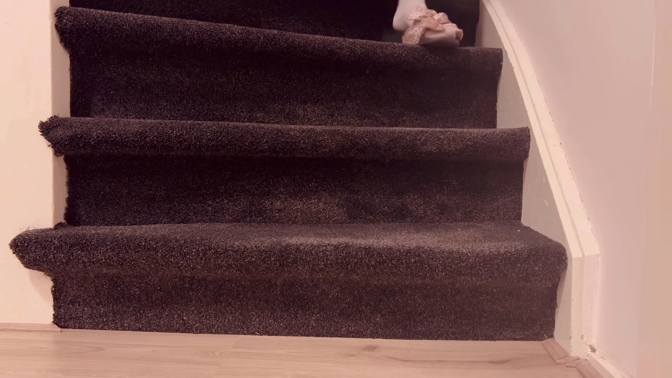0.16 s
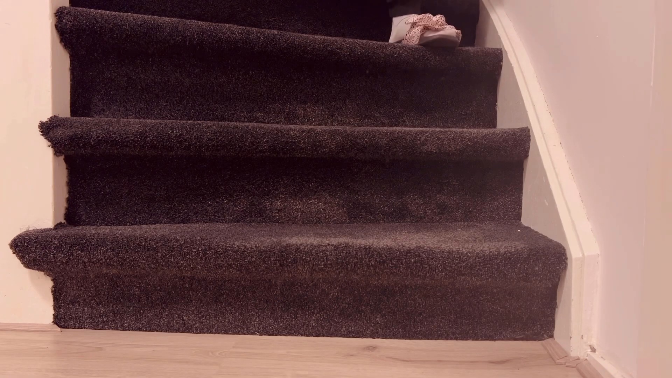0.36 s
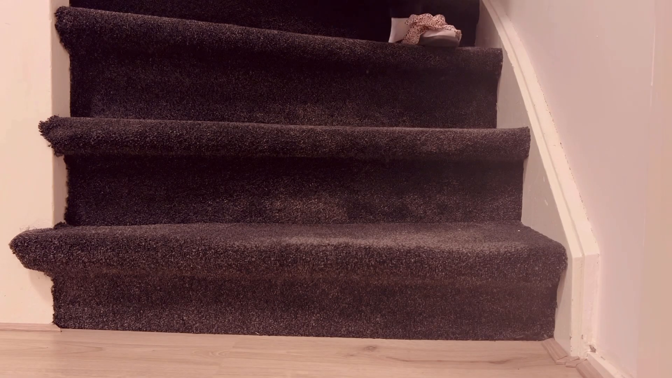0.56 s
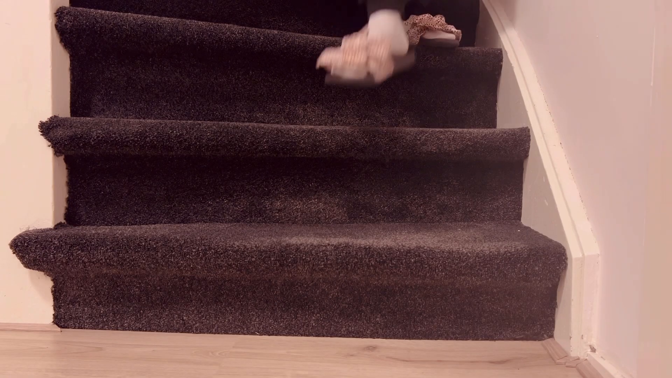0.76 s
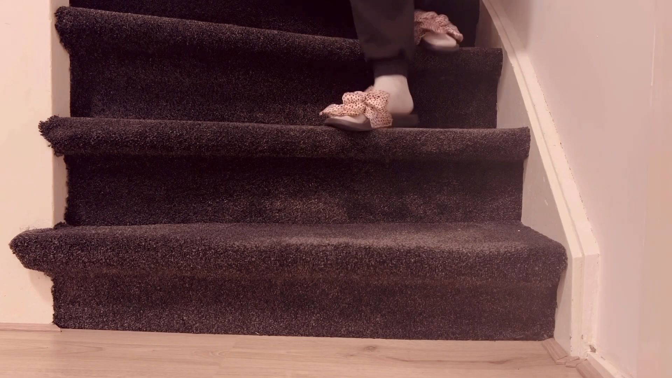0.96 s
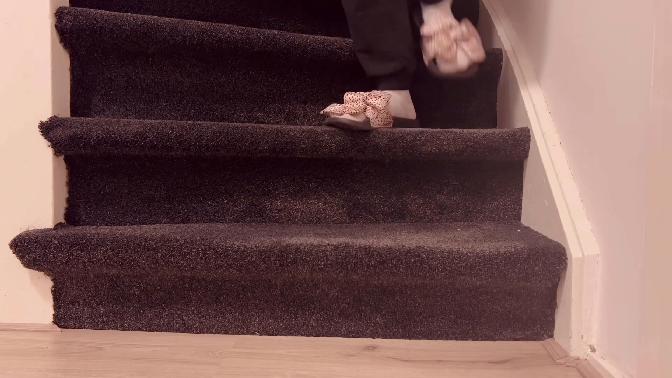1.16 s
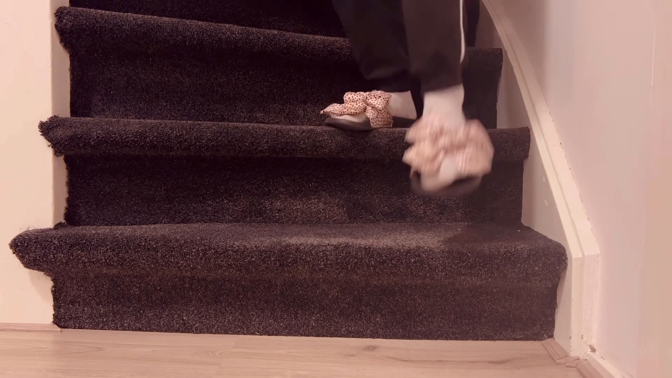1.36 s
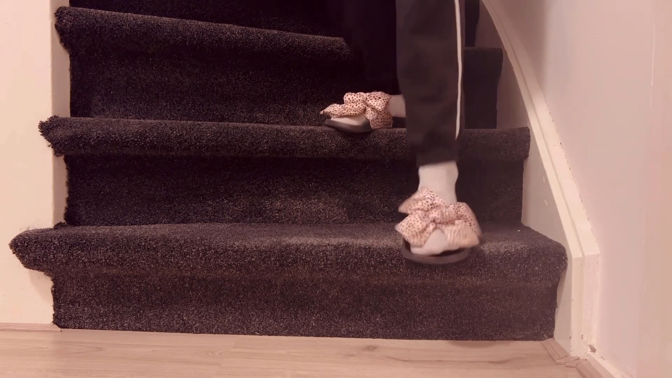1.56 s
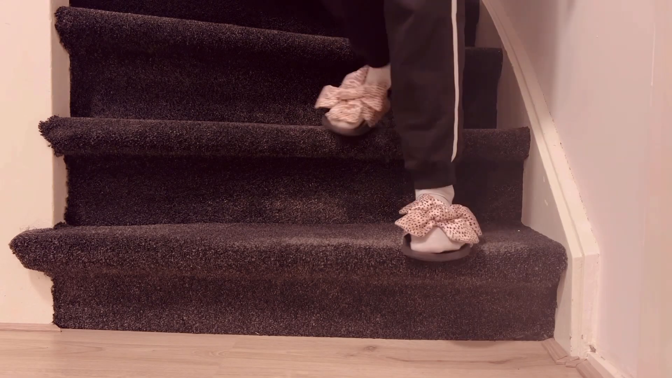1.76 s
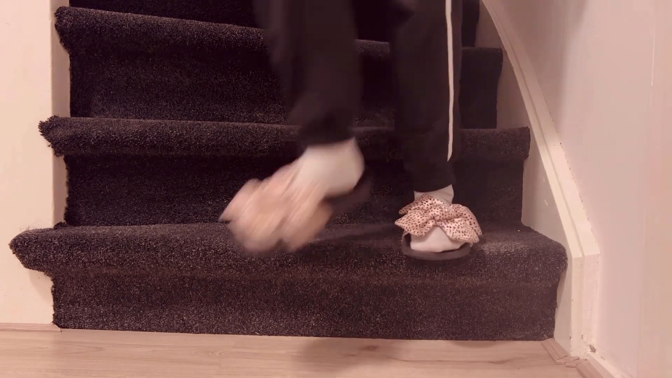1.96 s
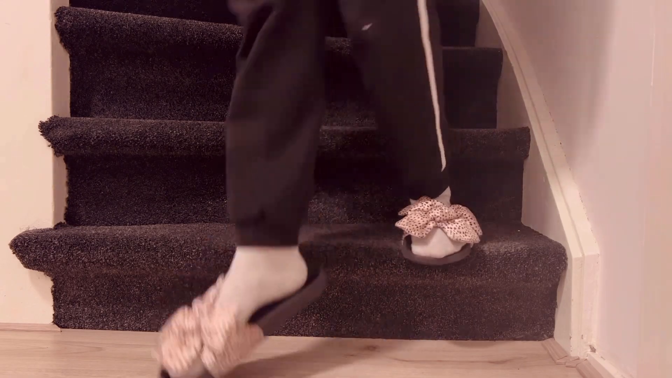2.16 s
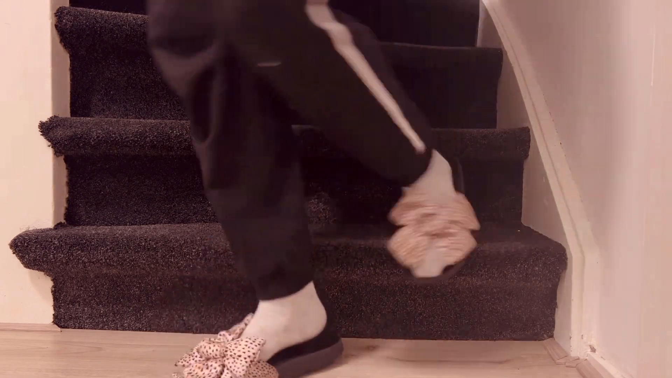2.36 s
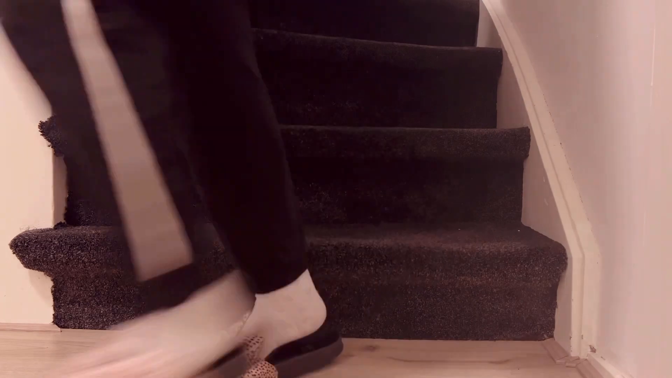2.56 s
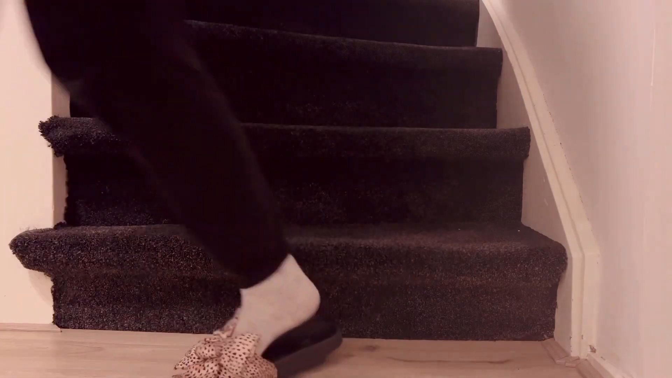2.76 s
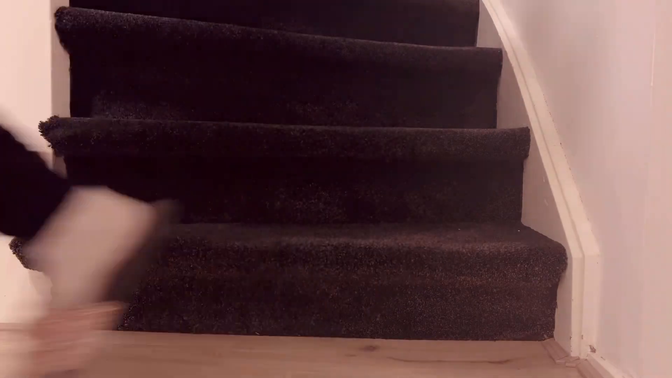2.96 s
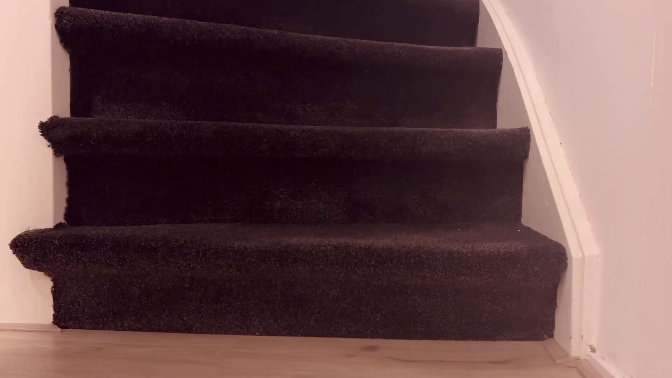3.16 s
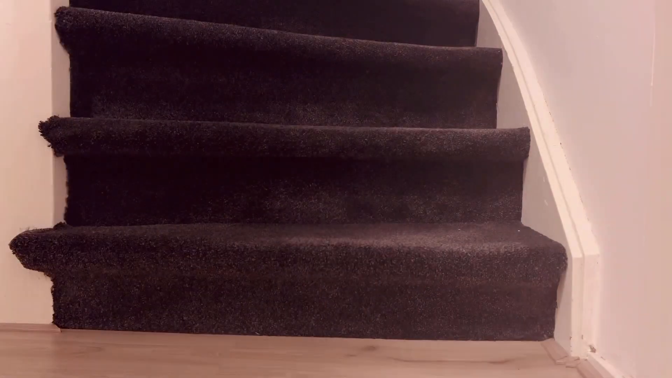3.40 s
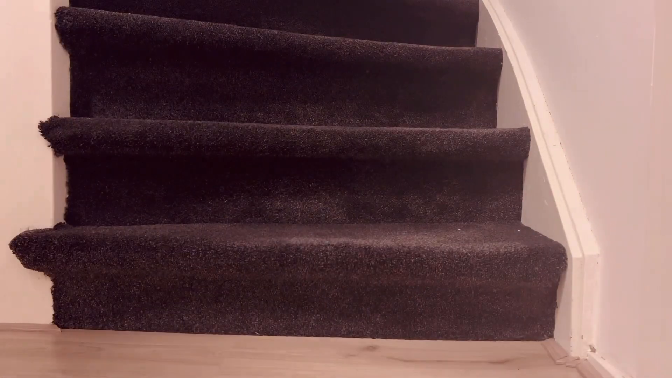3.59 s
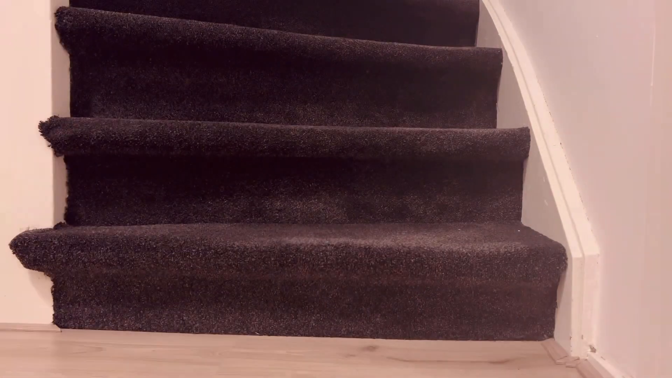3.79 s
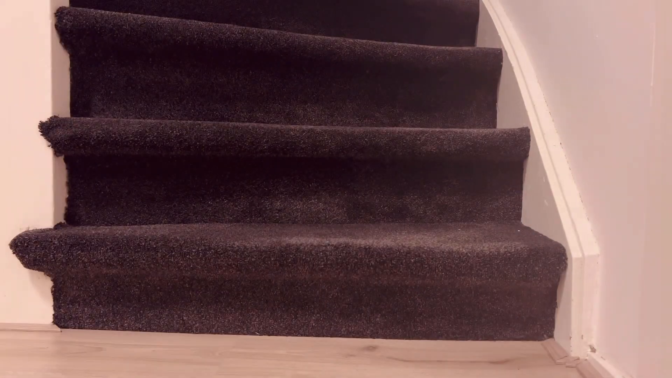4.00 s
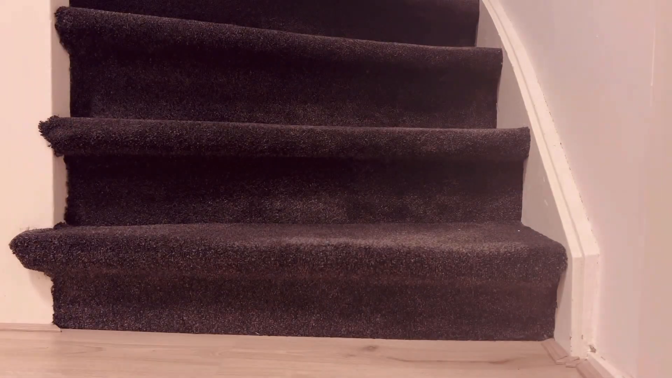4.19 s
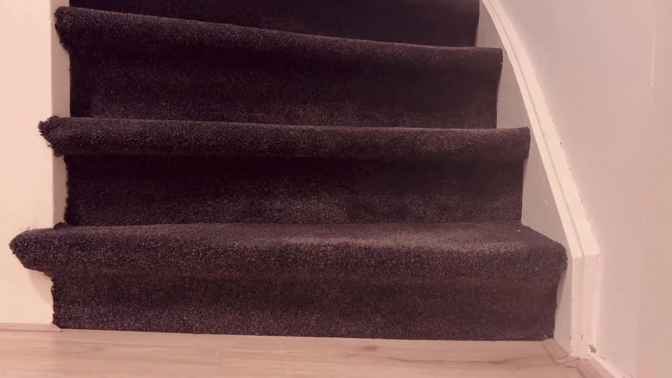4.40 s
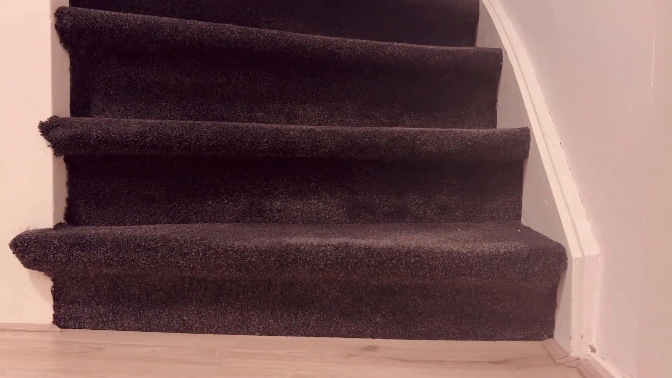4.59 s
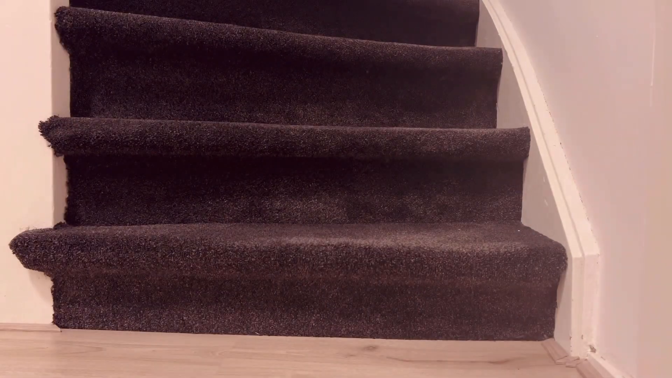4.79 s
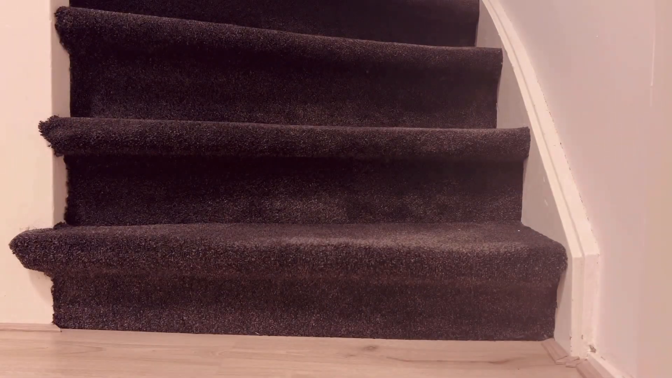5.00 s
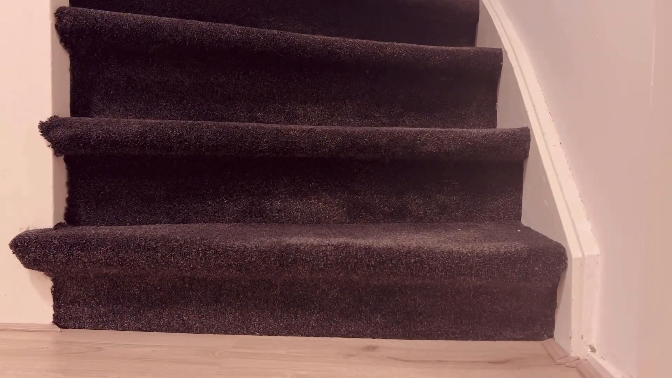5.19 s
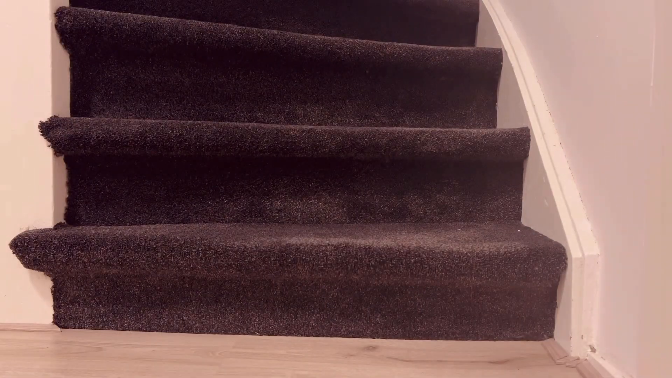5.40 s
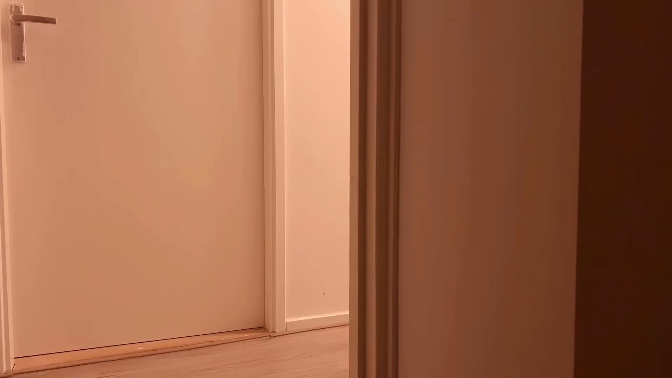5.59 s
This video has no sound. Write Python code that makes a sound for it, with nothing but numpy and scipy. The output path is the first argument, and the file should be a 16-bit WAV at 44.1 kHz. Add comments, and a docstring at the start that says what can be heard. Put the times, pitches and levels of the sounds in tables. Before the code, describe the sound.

Close by, someone in soft slippers comes down a carpeted wooden staircase: padded, low thuds with a hollow boom underneath and light brushing. A crisp flat slap marks the step onto laminate, then a clicking second step, a scuff, and fainter footfalls walking away. Small indoor hallway with a short reverb and faint low hum; close stereo microphone near the bottom of the stairs.

```python
"""Over a quiet house hum, slippered feet come down a carpeted wooden staircase, step onto a laminate
floor about two seconds in and walk off along a hallway. Landings ring damped board modes and load the
hollow stair, which booms; soles brush as filtered grains, tick as noise puffs and slap as air pulses.
A small hard hallway returns a short diffuse tail, its share growing as the walker leaves; two close
microphone ports hear each frequency with their own level and phase."""
import sys
import numpy as np
from scipy import signal
from scipy.fft import rfft, irfft, next_fast_len
from scipy.io import wavfile

SR = 44100
rng = np.random.default_rng(int(sys.argv[2]) if len(sys.argv) > 2 else 0)


def wrap_up_sound(samples):
    """Save the sound to the file named by the first command line argument, as 16-bit audio."""
    columns = np.atleast_2d(samples).T
    # keep every value between -1 and 1, then stretch to whole-number steps
    tamed = np.clip(columns, -1, 1)
    steps = np.round(tamed * 32767).astype(np.int16)
    wavfile.write(sys.argv[1], SR, steps)


def how_loud(loudness_db):
    """Turn decibels into a plain amplitude multiplier (0 dB gives 1, 20 dB gives 10)."""
    steps = np.asarray(loudness_db, float) / 20
    return 10 ** steps


N = 249149


def at_hz(points, hz):
    """Interpolation on a log-frequency axis: equal ratios of frequency count as equal distances."""
    return np.interp(np.log(hz), np.log(np.array(points)[:, 0]), np.array(points)[:, 1])


def rms_one(x):
    """Normalisation: scale a signal to unit rms."""
    return x / np.sqrt(np.mean(x ** 2) + 1e-20)


def ring(force, hz, t60):
    """Damped resonator: a unit click sets a decaying sine of height 1 ringing."""
    radius = how_loud(-60 / (t60 * SR))
    angle = 2 * np.pi * hz / SR
    return signal.lfilter([0, np.sin(angle)], [1, -2 * radius * np.cos(angle), radius ** 2], force + 1e-18)


def diffuse_bands():
    """Diffuse-field coherence: half-octave noise bands of equal power per Hz, as (Hz, filter, noise)."""
    # left-right correlation of a diffuse sound: hz, likeness (0 to 1)
    diffuse_likeness = [(100, 0.93), (200, 0.93), (320, .6), (500, 0.27), (1500, 0.055), (4000, 0.033),
                        (9000, 0.1)]
    settle = 4000   # samples dropped while the filters start up
    band_edges_hz = 22 * 2 ** np.arange(0, 9.7, 0.5)
    white = rng.standard_normal((2, 2, N + settle))   # adjacent bands take independent noise
    for k, (low, high) in enumerate(zip(band_edges_hz, band_edges_hz[1:])):
        sos = signal.butter(2, [low, high], "band", fs=SR, output="sos")
        mid, side = signal.sosfilt(sos, white[k % 2])[:, settle:]
        hz = np.sqrt(low * high)
        alike = np.clip(at_hz(diffuse_likeness, hz), 0, 1)
        yield hz, sos, np.sqrt(1 + alike) * mid + np.sqrt(1 - alike) * side * [[1], [-1]]


def hum():
    """Stationary coloured noise: a steady low rumble of the house and a hiss above it."""
    # spectrum of the house rumble: hz, level_db per Hz (relative)
    rumble_colour = [(25, -31), (42, 0.5), (59, -1.5), (75, -16), (86, 1), (107, -1), (166, -15.5),
                     (202, -13.5), (317, -23.5), (525, -24.5), (788, -31.5), (1030, -37.5), (1200, -38),
                     (1560, -65.5), (2640, -120)]
    # spectrum of the preamp and far air hiss: hz, level_db per Hz (relative)
    hiss_colour = [(710, -36.5), (1200, -10.5), (1270, -8), (1630, -3), (2200, 0), (2710, -6), (3150, -6),
                   (4750, -9), (8530, -8.5), (10000, -23), (11900, -17.5), (16000, -26)]
    rumble_rms_db, hiss_rms_db = -65.5, -80.5
    diffuse = rfft(sum(noise for _, _, noise in diffuse_bands()))
    hz = np.fft.rfftfreq(N, 1 / SR) + 1
    rumble = rms_one(irfft(diffuse * how_loud(at_hz(rumble_colour, hz)), N))
    hiss = rms_one(irfft(diffuse * how_loud(at_hz(hiss_colour, hz)), N))
    return how_loud(rumble_rms_db) * rumble + how_loud(hiss_rms_db) * hiss


def booms():
    """Modal excitation by a load: hollow modes swell as weight comes on, then decay exponentially."""
    # body weight coming onto the structure: start_s, level_db (of the favoured mode, before its decay),
    # favoured_mode (0 = highest, 2 = lowest; fractions lie between modes)
    loads = [(0.036, -49.5, 0.1), (0.15, -31, 0.35), (0.197, -37, 0.078), (0.278, -37.5, 1.03),
             (0.385, -48, 0.78), (0.516, -45.5, 0.3), (0.726, -36, 0.57), (0.866, -32, 0.042),
             (0.924, -43, 1.2), (1.001, -49, 0.05), (1.067, -44, 0.14), (1.549, -25.5, 0.035),
             (1.574, -25, 0.034), (1.629, -30, 2.3), (1.763, -36, 0.4), (1.839, -53, 0.2),
             (1.947, -60.5, 1.3), (2.194, -43, 0.2), (2.231, -41.5, 0.45), (2.71, -47, 1.2),
             (2.751, -34.5, 0.55), (2.831, -45, 0.52), (3.272, -49.5, 0.73), (3.4, -49, 1.6),
             (3.857, -51.5, 0.57), (3.957, -59.5, 2.1), (4.197, -61, 0.057), (4.38, -54, 0.35),
             (4.428, -44, 0.55), (4.989, -58, 0.071), (5.302, -55, 0.43)]
    # modes of the air and joists under the stair: pitch_hz
    hollow_hz = [101.5, 75, 50]
    # decay of those modes: t60_s
    hollow_t60_s = [0.26, .35, .4]
    loading_ms = 9.1   # time constant of the weight coming down
    neighbour_loss_db = 11.5   # weakening per mode step away from the favoured one
    t = np.arange(N + SR) / SR
    since = t[:SR]
    swell = 1 - np.exp(-1000 * since / loading_ms)
    out = np.zeros(N)
    for k, (hz, t60) in enumerate(zip(hollow_hz, hollow_t60_s)):
        swing = np.zeros(N + SR)
        for s, db, favoured in loads:
            at = round(s * SR)
            decay_db = db - neighbour_loss_db * abs(k - favoured) - 60 * since / t60
            swing[at:at + SR] += swell * how_loud(decay_db)
        # all loads share one continuous phase, so each swells in step with the ringing
        out += (swing * np.sin(2 * np.pi * (hz * t + rng.random())))[:N]
    return out


def brushing():
    """Stick-slip friction: fibres and grit slip under the sole as dense uneven grains, in strokes."""
    # spectrum of sole on carpet and laminate: hz, level_db per Hz (relative)
    brush_colour = [(350, -32), (600, -4.5), (829, -6), (910, -24), (1820, -11.5), (3130, -14), (5270, -16),
                    (8460, -13.5), (9500, -6.5), (12400, -66), (20900, -120)]
    # brushes of the sole: peak_s, peak_db (relative), rise_s, fade_s, top_share_db, rasp_share_db
    strokes = [(0.144, -81, .014, 0.11, -10, 11.5), (0.379, -71.5, 0.029, 0.057, -3, -0.5),
               (0.72, -78, 0.0097, 0.075, -5, -3), (0.892, -75.5, 0.031, 0.15, -6, -0.5),
               (1.06, -72.5, 0.043, 0.048, 0.5, 5), (1.436, -71.5, 0.0079, 0.065, -3, 2),
               (1.542, -84, 0.033, 0.22, -3.5, 12.5), (1.65, -83, 0.016, 0.1, -1.5, -4),
               (1.752, -63, 0.018, 0.045, -6, -3.5), (2.204, -65, 0.0079, 0.18, 2.5, -5.5),
               (2.351, -75.5, 0.089, 0.04, -9, 12), (2.705, -78.5, 0.016, 0.11, -6, 12),
               (2.76, -66.5, 0.029, 0.27, -7, 2.5), (3.33, -73.5, 0.093, 0.19, -9.5, 3.5),
               (3.47, -75.5, 0.18, 0.11, -10, 1), (3.86, -81.5, 0.012, 0.19, -16, 1.5),
               (4.0, -80, 0.36, 0.12, -3.5, 9.5), (4.03, -73, 0.026, 0.025, 6, 0),
               (4.396, -68, 0.018, 0.13, -15, -21), (4.449, -61, 0.027, 0.15, -18, -7.5),
               (4.6, -80, 0.36, 0.043, -11.5, -3), (4.988, -76, .03, .14, -12, -1),
               (5.288, -79.5, 0.081, .14, -8.5, -1.5)]
    stroke_span_db = 20   # level change over one rise_s or one fade_s
    rasp_below_hz, top_above_hz, edge_steepness = 3500, 5900, 8
    t = np.arange(N) / SR
    grain_height = how_loud(1.543 * np.minimum(rng.exponential(1, N), 5))
    grains = grain_height * rng.standard_normal(N)
    hz = np.fft.rfftfreq(N, 1 / SR) + 1
    spectrum = rfft(grains) * how_loud(at_hz(brush_colour, hz))
    low = 1 / (1 + (hz / rasp_below_hz) ** edge_steepness)
    high = 1 / (1 + (top_above_hz / hz) ** edge_steepness)
    rasp, middle, top = [irfft(spectrum * part, N) for part in (low, 1 - low - high, high)]
    out = np.zeros(N)
    for s, db, rise_s, fade_s, top_db, rasp_db in strokes:
        on = slice(max(round((s - 2 * rise_s) * SR), 0), round((s + 2 * fade_s) * SR))
        distance = np.maximum((s - t[on]) / rise_s, (t[on] - s) / fade_s)
        envelope = how_loud(db - stroke_span_db * distance)
        out[on] += envelope * (middle[on] + how_loud(top_db) * top[on] + how_loud(rasp_db) * rasp[on])
    return out / np.std(middle + top)


def ticks():
    """Impulsive contact: a hard sole edge gives a millisecond or two of noise, partly resonant."""
    # ticks of the sole edge: start_s, peak_db (nominal), centre_hz
    edge_ticks = [(.142, -56.5, 2840), (.718, -60, 4000), (.894, -65, 2100), (1.4345, -47, 8850),
                  (1.441, -57, 7500), (1.539, -54.5, 1900), (2.098, -46, 2200), (2.1225, -48, 2290),
                  (2.128, -47, 2230), (2.1958, -23.5, 8800), (2.1962, -26.5, 4750), (2.2005, -44, 5080),
                  (2.705, -54, 4000), (2.752, -27.5, 4300), (2.756, -32.5, 6500), (2.7655, -31.5, 6750),
                  (2.773, -32, 4330), (2.782, -45.5, 2610), (2.8, -43, 2500), (3.268, -52.5, 3014),
                  (4.447, -47, 4530), (4.987, -65, 2194)]
    decay_ms = 1.1
    span = 900   # samples
    t = np.arange(span) / SR
    out = np.zeros(N + span)
    noise = rng.standard_normal((len(edge_ticks), span))
    for (s, db, hz), n in zip(edge_ticks, noise):
        puff = n * np.exp(-1000 * t / decay_ms)
        bright = np.diff(puff, prepend=0) * hz / 15000
        puff = bright + 0.2 * ring(puff, hz, 7 / hz)
        at = round(s * SR)
        out[at:at + span] += how_loud(db) * puff / 3 / np.std(puff[:90])   # peak taken as three deviations
    return out[:N]


def knocks(steps, modes):
    """Modal synthesis: each blow rings all board modes; returns direct sound and hallway feed."""
    # more hallway as the walker leaves: time_s, share_db (relative)
    hall_share = [(0.1, -7), (2.0, -4.5), (3.0, -2), (3.9, 0.5), (5.3, 4.5)]
    slope_from_hz, slope_to_hz = 242, 1600   # range over which a soft contact dulls the modes
    middle_hz, middle_octaves = 647, 0.82   # centre and 1/e half width of the middle modes
    s, db, slope_db, middle_db = np.transpose(steps)
    hall_db = np.interp(s, *np.transpose(hall_share))
    at = np.round(s * SR).astype(int)
    out = np.zeros((2, N))
    for k, (hz, mode_db, t60) in enumerate(modes):
        octaves = np.log2(np.clip(hz, slope_from_hz, slope_to_hz) / slope_from_hz)
        middle = np.exp(-(np.log2(hz / middle_hz) / middle_octaves) ** 2)
        blow_db = db + slope_db * octaves + middle_db * middle + mode_db
        blows = np.zeros((2, N))
        blows[:, at] = how_loud(blow_db) * [np.ones(len(s)), how_loud(hall_db)]
        soft = signal.lfilter(*signal.butter(1, hz, fs=SR), blows)   # the padding rounds the contact
        out += ring(soft, hz, t60) * (-1) ** k   # neighbouring modes start in opposite sense
    return out


def slaps(cycles):
    """Air displacement: a flat sole squeezes out a heavily damped pressure pulse, suction first."""
    # sole landings: start_s, peak_db (nominal), pulse_hz
    sole_slaps = [(.148, -33.5, 293), (0.386, -54.5, 404), (.734, -40, 260), (.866, -34, 252),
                  (0.951, -37, 300), (1.078, -38.5, 190), (1.542, -36.5, 329), (1.612, -44, 336),
                  (1.767, -39, 344.4), (2.1977, -11, 998), (2.2035, -26.5, 330), (2.7078, -28, 335),
                  (2.752, -34, 310), (2.761, -29.5, 390), (2.875, -38, 212), (3.27, -37.5, 275),
                  (3.856, -41.5, 248), (4.988, -48, 1600)]
    out = np.zeros(N)
    for s, db, hz in sole_slaps:
        click = np.zeros(2000)
        click[0] = -how_loud(db)
        rounded = signal.lfilter(*signal.butter(2, 2 * hz, fs=SR), click)
        at = round(s * SR)
        out[at:at + 2000] += ring(rounded, hz, cycles / hz)   # falls 60 dB in this many cycles
    return out


def hallway(x, gap_s):
    """Statistical reverberation: walls store each band's energy and return it as decaying noise."""
    # reverberation time of the hallway: hz, t60_s
    hall_t60 = [(150, 0.52), (300, 0.38), (1000, 0.36), (3000, 0.24), (9000, 0.14)]
    late = np.concatenate([np.zeros(round(gap_s * SR)), x])[:N]
    out = 0
    for hz, sos, noise in diffuse_bands():
        keep = how_loud(-120 / (at_hz(hall_t60, hz) * SR))   # power kept per sample: 60 dB lost in one t60
        power = signal.sosfilt(sos, late) ** 2
        stored = signal.lfilter([1 - keep], [1, -keep], power)
        out = out + rms_one(noise) * np.sqrt(stored)
    return out


def ports(x):
    """Inter-channel differences: two ports hear each frequency with their own level and phase."""
    # level difference: hz, left_minus_right_db
    port_balance = [(100, -.4), (320, -4.5), (550, 0), (1500, 1), (2500, .5), (5200, 5), (8500, .5),
                    (12000, 0)]
    # phase difference: hz, left_lead_rad
    port_phase = [(250, 0), (420, 0.98), (970, 1.96), (1300, 1.5), (2200, 0.2), (2900, 1.53), (6700, 0.84),
                  (8900, -8.5), (11700, -6)]
    # response common to both ports: hz, level_db
    port_colour = [(25, -21), (42, 4), (3000, 0), (5000, 4), (8600, 6), (9500, -2.5), (10200, -23),
                   (11500, -14), (16000, -26.5)]
    size = next_fast_len(N + 4096)
    hz = np.fft.rfftfreq(size, 1 / SR) + 1
    # each port takes half of the difference, in opposite sense
    half = how_loud(at_hz(port_balance, hz) / 2) * np.exp(0.5j * at_hz(port_phase, hz))
    coloured = rfft(x, size) * how_loud(at_hz(port_colour, hz))
    return irfft(coloured * [half, 1 / half], size)[:, :N]


def scene():
    """Superposition: contacts sound in the hallway; the boom arrives through the structure."""
    # heel and toe knocking the boards: start_s, peak_db (relative),
    # slope_db per octave towards the higher modes (softer = steeper), middle_modes_db (extra)
    blows = np.array([(0.147, -30, -14, -3), (0.202, -46, -15, 0), (0.387, -44, -10, 4.5),
                      (0.506, -57, -8.5, 5), (0.518, -44, -18.5, 1), (0.727, -42.5, -18.5, 10),
                      (0.864, -32, -9, -21.5), (0.924, -48.5, -4.5, -3), (0.943, -42, -9, -21),
                      (1.074, -50, -4.5, -12), (1.437, -46.5, -5.5, -9.5), (1.543, -28, -12.5, -10.5),
                      (1.627, -33, -15.5, -23), (1.767, -48, -5, 3), (2.101, -45, -8, 9),
                      (2.197, -23, -2.5, -0.5), (2.706, -33, -5.5, 5), (2.753, -35.5, -4.5, 4),
                      (2.8, -65.5, 6.5, 9), (2.872, -45, -6.5, -29), (3.269, -38, -12, 10),
                      (3.395, -47, -3.5, -29), (3.489, -55.5, -7.5, 4), (3.855, -43.5, -9, 10),
                      (3.957, -52, -0.6, -5), (4.376, -50, -16.5, 10), (4.441, -52.5, -6, -5),
                      (4.989, -53.5, -6.5, 19.5), (5.3, -51.5, -17, 11)])
    # board modes of the stair: pitch_hz, level_db (relative), t60_s
    tread_modes = [(129.6, 0.5, 0.1), (187, -10, 0.35), (215.3, -4.5, 0.1), (281, -2.5, 0.07),
                   (329, -23.5, 0.064), (376.6, -1.5, 0.088), (428, -2, 0.038), (620, -1.5, 0.15),
                   (762, 1.5, 0.052), (1070, 11, 0.014), (1600, 6.5, 0.0071)]
    # board modes of the laminate floor: pitch_hz, level_db (relative), t60_s
    laminate_modes = [(178, -8, 0.17), (228, -2, 0.049), (300, 5, 0.032), (395, -4, 0.12),
                      (490, -2.5, 0.039), (648, 2.5, 0.021), (776, -1.5, 0.047), (1056, 7, 0.013),
                      (1488, 4, 0.018), (1900, 2, .004)]
    floor_reached_s = 2.0
    on_stair = blows[:, 0] < floor_reached_s
    stair = how_loud(-2) * knocks(blows[on_stair], tread_modes)
    floor = how_loud(-1.5) * knocks(blows[~on_stair], laminate_modes)
    knock, knock_feed = stair + floor
    tick = ticks()
    brush = how_loud(2.5) * brushing()
    hall_feed = how_loud(4.5) * knock_feed + how_loud(-2.0) * tick + how_loud(-2.0) * brush
    tail = hallway(hall_feed, gap_s=0.002)
    return ports(knock + slaps(cycles=4.03) + tick + brush + tail + booms()) + hum()


def roll_off(x):
    """The treble ends steeply here."""
    return signal.sosfilt(signal.butter(12, 16620, fs=SR, output="sos"), x)


def record(dry):
    """Signal chain: the finished mix passes through the last stage."""
    return roll_off(dry)


dry = scene()
out = record(dry)
wrap_up_sound(out)
```